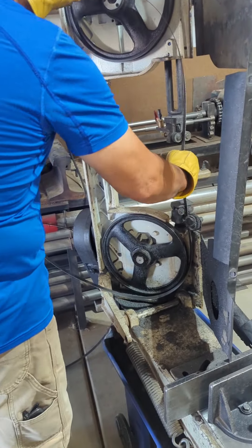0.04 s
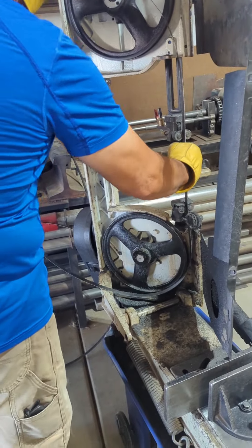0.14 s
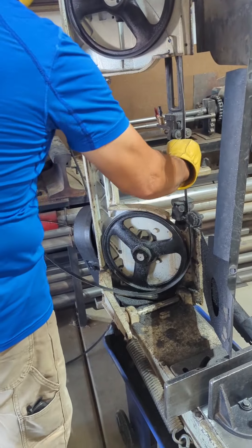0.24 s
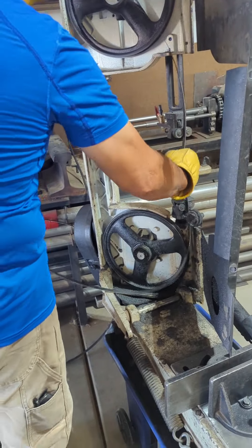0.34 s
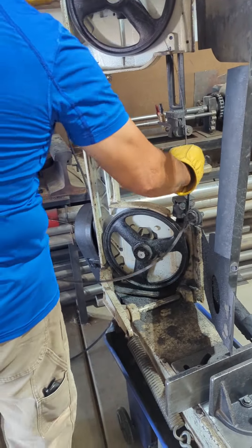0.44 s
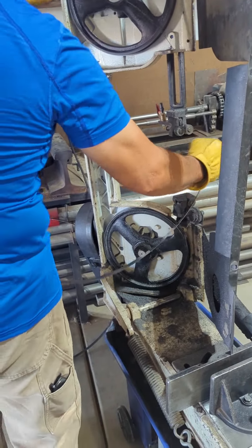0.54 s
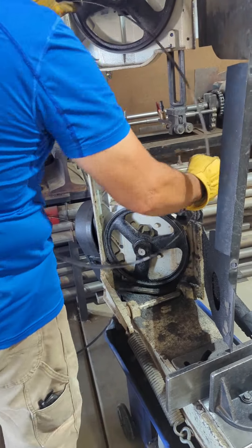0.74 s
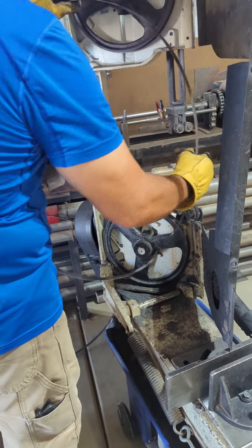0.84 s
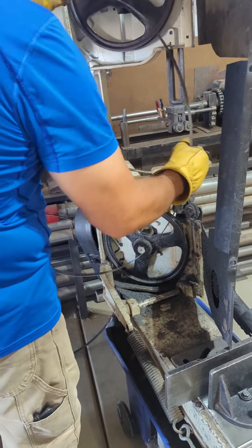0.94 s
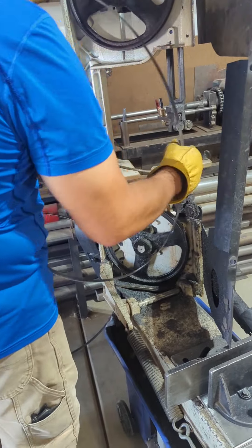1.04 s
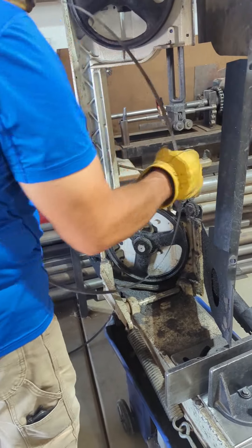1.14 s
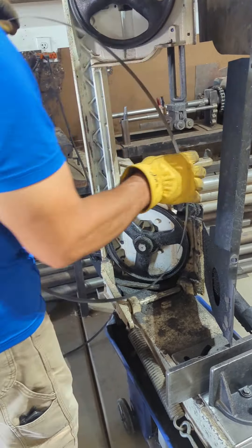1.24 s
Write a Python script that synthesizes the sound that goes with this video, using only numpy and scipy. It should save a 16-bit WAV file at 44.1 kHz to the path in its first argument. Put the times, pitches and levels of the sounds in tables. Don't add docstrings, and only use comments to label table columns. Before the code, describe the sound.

Steel band scraping and knocking against metal guides as it is pulled loose in a workshop

```python
import sys
import numpy as np
from scipy import signal
from scipy.io import wavfile

SR = 44100
rng = np.random.default_rng(int(sys.argv[2]) if len(sys.argv) > 2 else 0)


def natural_amplitude(level_db):
    exponent = np.asarray(level_db, float) / 20
    return 10 ** exponent


def generate_wav(sig):
    pcm = np.round(np.clip(np.atleast_2d(sig).T, -1, 1) * 32767).astype(np.int16)
    wavfile.write(sys.argv[1], SR, pcm)


N = 57330

# (time [s], friction level [dB], load passed into the frame [dB],
# brightness [-1 dull to 1 bright])
SLIDE = [(.12, -87, -92, -0.098), (.172, -73, -79, 0.19), (0.185, -45, -51, -0.92),
         (.25, -45.5, -47.5, -0.52), (0.309, -62, -63, -0.97), (0.387, -40.5, -51.5, 0.093),
         (0.409, -31.5, -47.5, 0.23), (0.43, -38, -51, 0.22), (.46, -43.5, -43, -0.076),
         (.53, -42.5, -51, -0.17), (.575, -38, -43.5, -0.21), (.62, -35, -43, -0.013),
         (.66, -43.5, -44, 0.17), (.70, -46.5, -46, 0.29), (0.768, -40, -46.5, -0.0045),
         (0.837, -57, -54.5, -1.16), (.856, -40.5, -61, 0.1), (.925, -48, -56, -0.22)]
# (time [s], length [s], level [dB], cut-off [Hz])
BRUSH = (1.04, .11, -55, 2500)
# (time [s], level [dB], brightness [dB per octave], chatter [s],
# body below the guide's cut-off [dB])
KNOCKS = [(.177, -63, -3, 0.004, -10), (0.182, -50.5, -5.5, 0.0063, -2.5), (0.193, -47, 19, 0.002, 6),
          (0.216, -57, 3, 0.0017, -2.5), (0.22, -38, 25.5, 0.0066, -12), (.332, -50, -4, 0.0022, -9),
          (.402, -52, -0.5, 0.0076, -1.5), (0.409, -42, 4, 0.006, -5), (0.422, -38, -0.5, 0.0022, -29.5),
          (.432, -50, -5, 0.00085, -7), (.564, -45, -12.5, 0.0034, -25), (.569, -39.5, -8.5, 0.009, -9.5),
          (.586, -37, 0, 0.0015, -6), (.5955, -29, 2.5, 0.001, -4), (0.606, -43.5, -1.5, 0.0059, -7),
          (0.618, -48, -15.5, 0.0079, -19), (0.628, -33.5, 5.5, 0.0032, -3.5),
          (.641, -49, -13, 0.0071, -16), (0.656, -42.5, -12.5, 0.0017, 7.5), (0.703, -27, 0, 0.0022, -13.5),
          (.706, -31, 2, .003, -29.5), (.713, -34, -0.5, 0.0065, -12), (0.848, -46.5, 2, 0.0034, 12),
          (0.865, -64, -6, 0.0024, -8.5)]
# (time [s], length [s], pitch [Hz], level [dB], unsteadiness [Hz])
SINGS = [(.188, .016, 14800, -49, 350), (.219, .022, 14550, -42, 150), (.407, .014, 6300, -41, 120),
         (.235, .06, 14700, -57, 300), (.403, .011, 7600, -47, 80), (.404, .016, 5200, -47, 120),
         (.404, .01, 1800, -47, 80), (.416, .011, 1500, -46, 60), (.702, .018, 1500, -39, 30),
         (.35, .12, 15000, -55, 350), (.7025, .016, 3140, -38, 60), (.702, .018, 3417, -36, 30),
         (.419, .014, 3380, -41, 50), (.429, .01, 2040, -39, 40), (.566, .014, 1510, -41, 40),
         (.568, .014, 2250, -46, 60), (.602, .03, 1576, -44, 25), (.626, .024, 1590, -45, 30),
         (.65, .02, 1620, -48, 50), (.585, .03, 520, -48, 10), (.848, .035, 872, -47, 12),
         (.582, .022, 1050, -45, 90), (.605, .03, 2300, -47, 80), (.872, .066, 2080, -45, 3),
         (.88, .068, 2205, -48.5, 4), (.91, .035, 2950, -54, 10), (.915, .03, 3270, -54, 20),
         (.864, .012, 3250, -52, 60), (.62, .02, 12200, -46, 150), (.855, .04, 11900, -54, 80),
         (.702, .022, 1830, -39, 40), (.703, .026, 2000, -40, 40), (.704, .024, 2690, -42, 30),
         (.584, .008, 1700, -40, 200), (.594, .006, 1800, -35, 80), (.592, .009, 3400, -41, 100),
         (.571, .03, 1980, -47, 40)]
# (time [s], length [s], start pitch [Hz], end pitch [Hz], level [dB])
HUMS = [(.2, .13, 240, 250, -51), (.3, .13, 250, 260, -51), (.277, .01, 260, 220, -45),
        (.294, .013, 230, 190, -45), (.39, .1, 150, 140, -53), (.415, .05, 335, 315, -51),
        (.53, .075, 250, 222, -47), (.53, .08, 138, 148, -51), (.61, .07, 150, 140, -45),
        (.6, .09, 225, 215, -51), (.595, .105, 342, 300, -42), (.66, .1, 125, 135, -49),
        (.735, .065, 140, 152, -47), (.78, .045, 252, 240, -51), (.84, .1, 232, 220, -53),
        (.845, .05, 570, 555, -53)]
# (frequency [Hz], level [dB per Hz])
BAND_COLOUR = [(350, -12), (1300, -8.5), (1550, -5.5), (3000, -8.5), (6000, -9), (13000, -13.5),
               (14800, -12), (16000, -16)]
# (frequency [Hz], level [dB], time to fall 60 dB [s])
GUIDE_MODES = [(1500, -1, .07), (1830, 0, .07), (1986, -1, .1), (2254, -2, .1), (2687, -2, .09),
               (2820, -5, .12), (3136, -2, .06), (3417, 0, .06), (3970, -5, .07), (4640, -6, .07),
               (8979, -9, .09), (9830, -8, .1), (12800, -10, .04), (13600, -8, .07)]
# (frequency [Hz], level [dB], time to fall 60 dB [s])
FRAME_MODES = [(122, -8, 0.06), (143, -6.5, 0.07), (196.5, -5.5, 0.05), (247, -6, 0.05), (296, -6.5, 0.036),
               (337, -5.5, 0.031), (400, -6, 0.03), (522, -10, .035), (592, -10, 0.031), (720, -12, 0.028)]
# (frequency [Hz], likeness [0 to 1])
LIKENESS = [(100, 0.98), (250, 0.99), (500, 0.24), (4000, 0.13)]
# (frequency [Hz], level [dB])
SHOP_COLOUR = [(30, -40.5), (50, 1), (82, 1), (200, -5.5), (420, -7), (1900, -9.5), (4000, -24.5),
               (8000, -49.5), (16000, -54.5)]

CATCHES_PER_S, CATCH_SPREAD_DB = 4000, 3
CLUMP_DB, CLUMP_HZ = 1.8, 70
TILT_DB = 7
BAND_T60_S, KNOCK_T60_S = 0.028, 0.041
KNOCK_CUT_HZ, CLEAR_MODES_DB = 1380, -3
SING_FLUTTER_DB = 1.3
SHOP_DB = -51.5
ROOM_T60_S, ROOM_DB, ROOM_CUT_HZ = 0.48, -7, 5900
RIGHT_DB = 0.36
BASS_CUT_HZ, TOP_HZ = 66, 15900


def rms_one(x):
    return x / np.sqrt(np.mean(x ** 2) + 1e-20)


def at_hz(points, hz):
    table = np.array(points)
    return np.interp(np.log(hz), np.log(table[:, 0]), table[:, 1])


def convolve(x, response):
    return signal.fftconvolve(np.atleast_2d(x), response, axes=1)[:, :N]


def drift(rate_hz):
    warm_up = SR // 4
    r = np.exp(-2 * np.pi * rate_hz / SR)
    noise = rng.standard_normal(N + warm_up)
    return rms_one(signal.lfilter([1], [1, -2 * r, r * r], noise)[warm_up:])


def hump(start, length):
    u = np.clip((np.arange(N) / SR - start) / length, 0, 1)
    return np.sin(np.pi * u ** .7) ** 2


def modes(hz, level_db, t60, spread):
    t60 = np.clip(t60, .004, .2)
    t = np.arange(int(.75 * t60.max() * SR)) / SR
    apart = rng.uniform(-np.pi / 2, np.pi / 2, (len(hz), 1)) * [[0.93, -1.086]]
    phase = rng.uniform(0, 2 * np.pi, (len(hz), 1)) + spread * apart
    strength = natural_amplitude(level_db) / np.sqrt(t60)
    turn_and_decay = 2j * np.pi * hz - np.log(1000) / t60
    ring = strength[:, None] * np.exp(t * turn_and_decay[:, None])
    out = np.imag(np.exp(1j * phase).T @ ring)
    return out / np.sqrt(np.sum(out ** 2) / 2)


def band_ring(t60, tilt_db, body_db=0, count=260):
    root = np.linspace(np.sqrt(350), np.sqrt(16000), count)
    hz = (root + rng.uniform(-0.2, 0.35, count)) ** 2
    level = at_hz(BAND_COLOUR, hz) + 5 * np.log10(hz)
    level += tilt_db * np.log2(hz / 4000)
    level += body_db * (hz < KNOCK_CUT_HZ) + rng.normal(0, 3.2, count)
    uneven_db = np.clip(rng.normal(0, 4.1, count), -5, 5)
    return modes(hz, level, t60 * natural_amplitude(uneven_db), 0.98)


def catches(rate):
    sizes_db = CATCH_SPREAD_DB * np.minimum(rng.exponential(1, N), 4)
    sizes = natural_amplitude(sizes_db) * rng.choice([-1, 1], N)
    clicks = sizes * (rng.random(N) < rate / SR)
    return rms_one(clicks) * natural_amplitude(CLUMP_DB * drift(CLUMP_HZ))


def slide():
    s, rub_db, _, bright = np.transpose(SLIDE)
    t = np.arange(N) / SR
    points = np.linspace(-1, 1, 6)
    force = natural_amplitude(np.interp(t, s, rub_db) - 780 * np.maximum(t - s[-1], 0))
    place = np.interp(t, s, bright)
    shares = np.array([natural_amplitude(0.68 * drift(12.0) - 14.3 * (place - p) ** 2) for p in points])
    shares /= np.sqrt(np.sum(shares ** 2, axis=0))
    out = np.zeros((2, N))
    for p, share in zip(points, shares):
        rub = force * share * catches(CATCHES_PER_S / 4)
        out += convolve(rub, band_ring(BAND_T60_S, TILT_DB * p))
    return out


def brush():
    start, length, level_db, cut_hz = BRUSH
    rub = natural_amplitude(level_db) * hump(start, length) * catches(CATCHES_PER_S)
    sound = convolve(rub, band_ring(BAND_T60_S, 0))
    return signal.lfilter(*signal.butter(1, cut_hz, fs=SR), sound)


def knocks():
    out = np.zeros((2, N + SR))
    t = np.arange(SR // 20) / SR
    hz, db, t60 = np.transpose(GUIDE_MODES)
    for s, level_db, tilt_db, chatter, body_db in KNOCKS:
        force = rng.standard_normal(len(t)) ** 3 * np.exp(-t / max(chatter, .0005))
        force[0] += 1.3 * np.sqrt(np.sum(force ** 2) * 0.0013 / max(chatter, .002))
        force *= natural_amplitude(level_db + 29.0) / np.sqrt(np.sum(force ** 2))
        clear_db = CLEAR_MODES_DB - 2 * max(tilt_db, 0)
        clear = natural_amplitude(clear_db) * modes(hz, db + rng.normal(0, 1, len(hz)), t60, 0.93)
        start = int(s * SR)
        for ring in clear, band_ring(KNOCK_T60_S, tilt_db, body_db):
            sound = convolve(np.pad(force, (0, ring.shape[1])), ring)
            out[:, start:start + sound.shape[1]] += sound
    return out[:, :N]


def held_tone(start, length, hz, level_db):
    middle_hz = hz.mean()
    apart = np.arccos(np.clip(at_hz(LIKENESS, middle_hz), 0, 1)) / 2 * rng.choice([-1, 1])
    phase = 2 * np.pi * np.cumsum(hz) / SR + rng.uniform(0, 2 * np.pi)
    tone = np.sin(phase + apart * np.array([[1], [-1]]))
    level = natural_amplitude(level_db + 3 + SING_FLUTTER_DB * drift(20 + middle_hz / 60))
    return level * tone * np.sqrt(hump(start, length)) / np.cos(apart)


def sings():
    out = np.zeros((2, N))
    for s, length, hz, db, sway in SINGS:
        out += held_tone(s, length, hz + sway * drift(170), db)
    return out


def frame_boom():
    s, _, load_db, _ = np.transpose(SLIDE)
    t = np.arange(N) / SR
    hz, db, t60 = np.transpose(FRAME_MODES)
    load = natural_amplitude(np.interp(t, s, load_db) - 52 * np.maximum(t - s[-1], 0)) * catches(1500)
    return convolve(load, modes(hz, db, t60, 0.078))


def frame_hums():
    t = np.arange(N) / SR
    out = np.zeros((2, N))
    for s, length, start_hz, end_hz, db in HUMS:
        path = np.interp(t, [s, s + length], [start_hz, end_hz])
        out += held_tone(s, length, path + 1.5 * drift(12), db)
    return out


def room(x):
    t = np.arange(SR) / SR
    white = rng.standard_normal((2, 2, SR)) * np.clip(t / 0.0039, 0, 1)
    dull = signal.sosfilt(signal.butter(2, ROOM_CUT_HZ, fs=SR, output="sos"), white[0])
    tail = dull * natural_amplitude(-60 * t / ROOM_T60_S) + 0.58 * white[1] * natural_amplitude(-120 * t / ROOM_T60_S)
    return natural_amplitude(ROOM_DB) * convolve(x, tail / np.sqrt(np.sum(tail ** 2) / 2))


def shop():
    out = np.zeros((2, N))
    edges = 24 * 2 ** np.arange(0, 9.6, .5)
    white = rng.standard_normal((2, 2, N + 8000))
    for k, (low, high) in enumerate(zip(edges, edges[1:])):
        sos = signal.butter(3, [low, high], "band", fs=SR, output="sos")
        mid, side = signal.sosfilt(sos, white[k % 2])[:, 8000:]
        hz = np.sqrt(low * high)
        alike = np.clip(at_hz(LIKENESS, hz), -1, 1)
        stereo = np.sqrt(1 + alike) * mid + np.sqrt(1 - alike) * side * [[1], [-1]]
        out += natural_amplitude(at_hz(SHOP_COLOUR, hz) + drift(15)) * stereo
    return natural_amplitude(SHOP_DB) * rms_one(out)


def scene():
    steel = slide() + brush() + knocks()
    mix = steel + room(steel) + sings() + frame_boom() + frame_hums() + shop()
    return mix * natural_amplitude([[-RIGHT_DB / 2], [RIGHT_DB / 2]])


def low_pass(x):
    return signal.sosfilt(signal.butter(12, 16980, fs=SR, output="sos"), x)


def record(dry):
    bass_cut = signal.butter(2, BASS_CUT_HZ, "high", fs=SR, output="sos")
    top_cut = signal.ellip(10, .5, 60, TOP_HZ, fs=SR, output="sos")
    mix = signal.sosfilt(np.vstack([bass_cut, top_cut]), dry)
    return low_pass(mix)


dry = scene()
out = record(dry)
generate_wav(out)
```